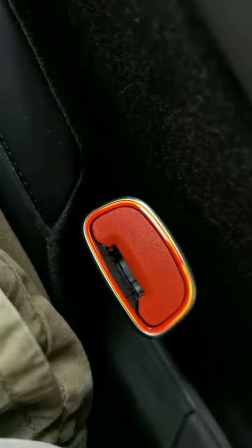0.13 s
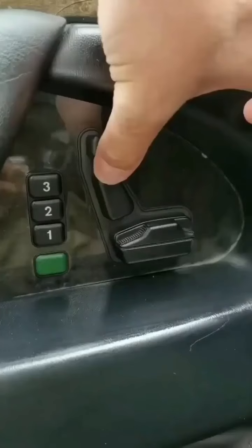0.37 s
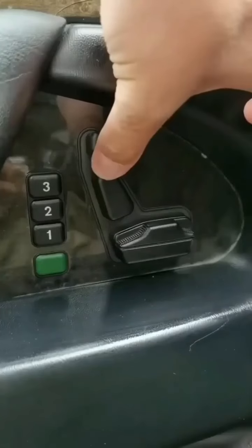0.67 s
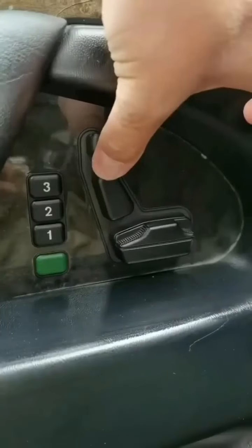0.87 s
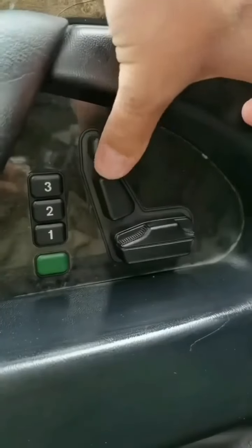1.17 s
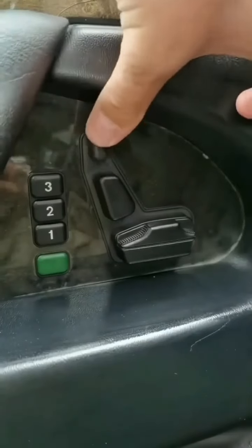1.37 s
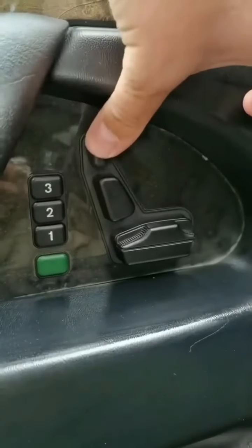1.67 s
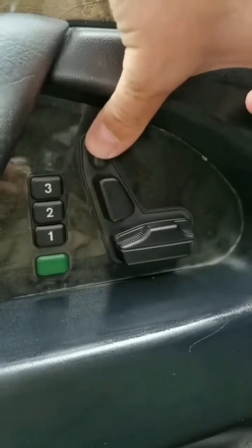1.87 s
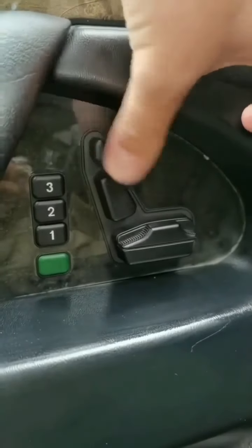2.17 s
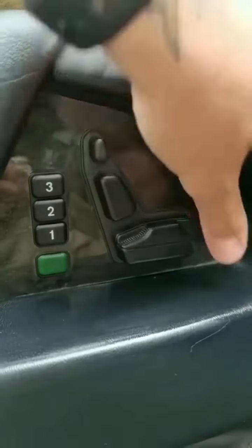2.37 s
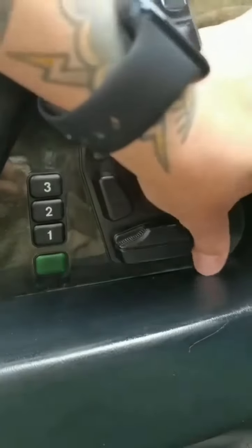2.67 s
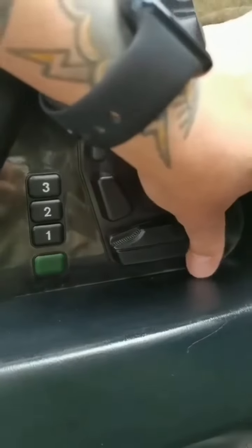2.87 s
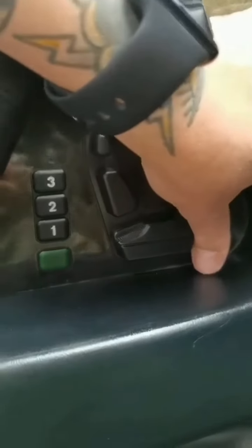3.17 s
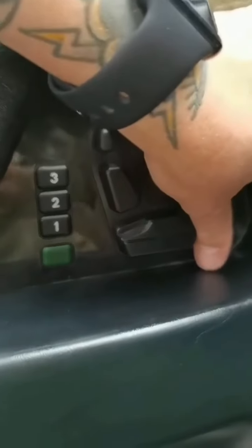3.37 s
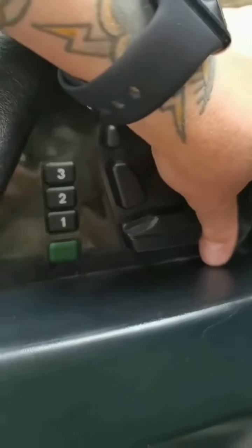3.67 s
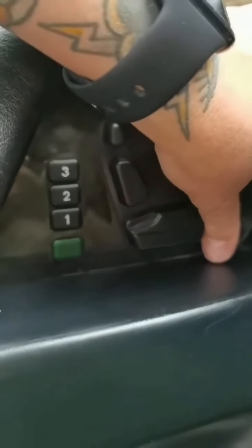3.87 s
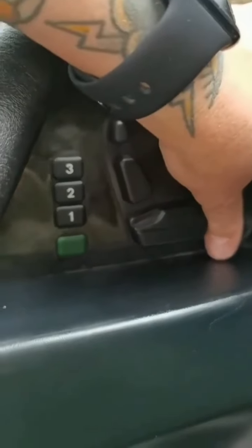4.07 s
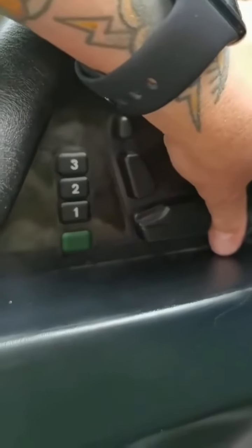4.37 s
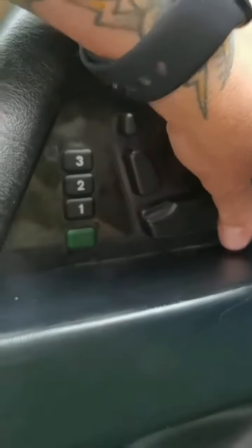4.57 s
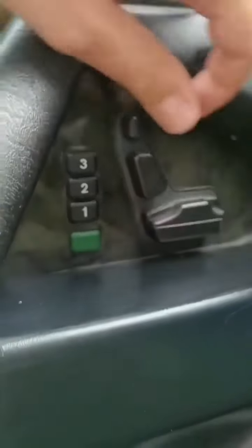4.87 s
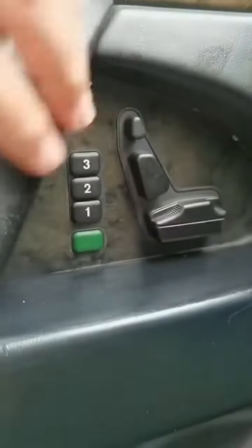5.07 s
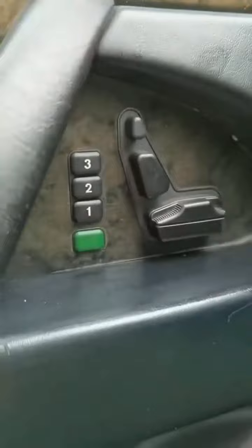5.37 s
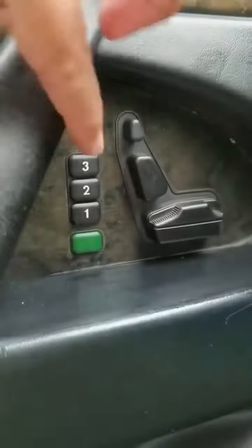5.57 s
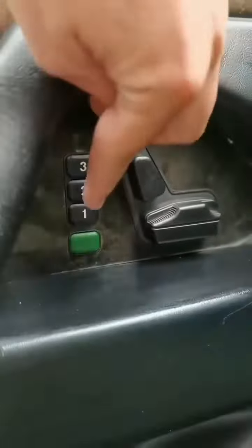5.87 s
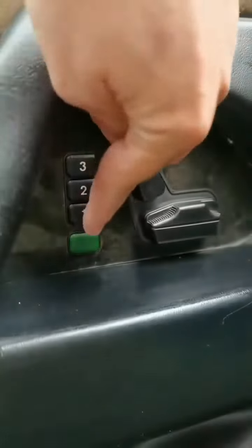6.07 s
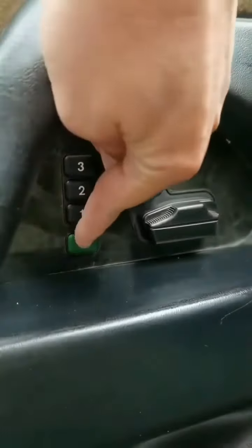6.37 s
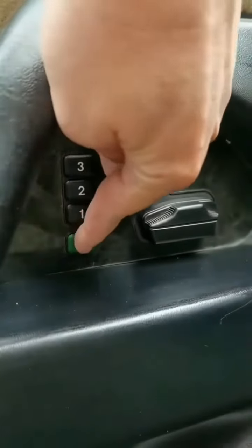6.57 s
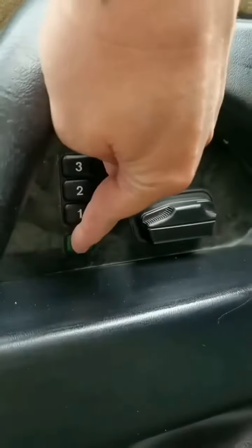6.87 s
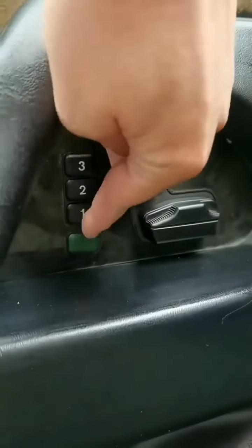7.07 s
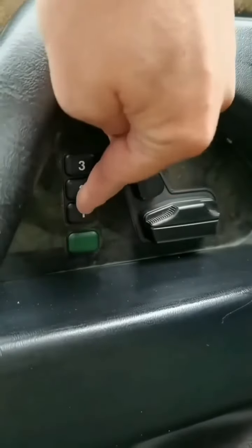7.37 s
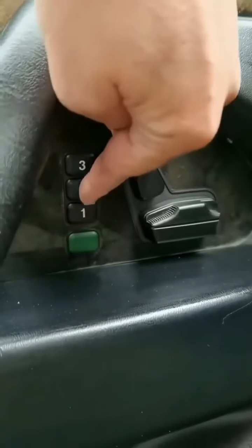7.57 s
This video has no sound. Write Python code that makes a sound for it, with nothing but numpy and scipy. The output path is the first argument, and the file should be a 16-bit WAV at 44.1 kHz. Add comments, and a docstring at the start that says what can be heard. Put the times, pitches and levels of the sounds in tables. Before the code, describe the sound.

Inside a car with its engine idling, switches snap, a power seat whines for a moment, then buttons click softly.

```python
"""A soft, centred rumble gives way abruptly to the throb of an idling car, heard from inside by the door.
A thumb works the plastic seat switches: each snap rings the door panel, and skin rubs and creaks on
the trim. For a second and a half a seat motor whines and hisses through its housing; then the memory
buttons click. Nearly all of it reaches the left microphone."""
import sys
import numpy as np
from scipy import signal
from scipy.fft import rfft, irfft
from scipy.io import wavfile
from scipy.ndimage import uniform_filter1d, map_coordinates

SR = 44100
rng = np.random.default_rng(int(sys.argv[2]) if len(sys.argv) > 2 else 0)


def pcm_store(signal):
    """Save signal as 16-bit PCM."""
    levels = np.round(np.clip(np.atleast_2d(signal), -1, 1) * 32767)
    wavfile.write(sys.argv[1], SR, levels.astype(np.int16).T)


N = 340452
TIME = np.arange(N) / SR
# modes of a seat switch in the door panel: f/Hz, t60/s, level/dB
SWITCH_MODES = [(119, 0.031, 15.5), (182.4, 0.13, 9), (520, 0.041, 7), (872, 0.043, 7), (1045, 0.014, 21.5),
                (1607, 0.021, -9.5), (2105, .025, 4.5), (2345, 0.031, 4), (3500, 0.02, 1.5),
                (4140, 0.018, 5.5), (4640, 0.0073, -3), (5600, 0.022, 2), (5910, 0.02444, 10.5),
                (6400, 0.036, 6.5), (8130, 0.015, -3.5), (8980, 0.014, 1.5), (11440, .012, -6)]
# switches snapping over their detents: t/s, contact time/s, knock/dB, snap/dB, tilt/(dB per octave),
# knock f/Hz, cap f/Hz, cap level/dB, delay until the thumb eases off/s
DETENTS = [(0.777, 0.0015, -40.5, -35.5, -0.5, 830, 5950, 14, 0.061),
           (1.4445, 0.0014, -36, -35, -4.5, 872, 5850, 11.5, .15),
           (1.8772, 0.0015, -37, -34.5, -1, 911, 6220, 18, 0.204),
           (2.4405, .0018, -42, -38, 1.5, 886, 5700, 10, 0.16),
           (3.18, 0.0019, -41, -32.5, 5, 675, 7200, -2, 0.081),
           (4.8656, .0028, -40, -33, 3.5, 524, 6100, 6, 0.14)]


def undb(db):
    """Decibels to amplitude ratio."""
    return 10 ** (np.asarray(db) / 20)


def unit(x):
    """Normalise to rms 1."""
    return x / np.sqrt(np.mean(x ** 2) + 1e-24)


def add(out, start, x):
    """Superpose x on out from a start time."""
    i = max(int(start * SR), 0)
    out[i:i + len(x)] += x[:len(out) - i]


def colour(x, points):
    """Spectral shaping by (f/Hz, level/dB) points, to rms 1."""
    hz, db = np.transpose(points)
    bins = np.maximum(np.fft.rfftfreq(len(x), 1 / SR), 1)
    gain = undb(np.interp(np.log(bins), np.log(hz), db))
    return unit(irfft(rfft(x) * gain, len(x)))


def band(x, lo, hi, order=2):
    """Causal band-pass filter."""
    return signal.sosfilt(signal.butter(order, [lo, hi], "band", fs=SR, output="sos"), x)


def noise():
    """White noise as long as the scene."""
    return rng.standard_normal(N)


def walk(rate):
    """Random modulation with a spread near 1 and `rate` new values a second."""
    hold = int(SR / rate)
    steps = np.repeat(rng.standard_normal(2048)[:N // hold + 1], hold)
    return 1.5 * uniform_filter1d(steps, hold)[:N]


def stroke(start, end):
    """Half-sine envelope between two times."""
    return 0.67 * np.sin(np.pi * np.clip((TIME - start) / (end - start), 0, 1))


def noise_swells(rows, spread):
    """Band-limited noise under half-sine envelopes; the band edges are centre / and * spread."""
    return sum(stroke(start, end) * undb(db) * unit(band(noise(), hz / spread, hz * spread))
               for start, end, hz, db in rows)


def cabin(left_db=-48.5, right_db=-63.5, rush_db=-75, rumble_db=-52.5, throb=0.16, rumble_s=0.571):
    """Amplitude modulation: after the opening rumble, the air on the left pulses with the engine."""
    # spectra of the rumble, a thin rush and the air on each side: f/Hz, relative level/dB
    rumble_spectrum = [(20, 4), (50, 2), (170, -1.5), (300, 4), (430, -7), (620, -20.5), (1000, -21.5),
                       (1150, -30.5), (2200, -34), (2700, -46), (6000, -49), (9000, -58), (13000, -54.5)]
    rush_spectrum = [(600, -36), (1100, -3.5), (1380, -2), (1610, 8.5), (1850, -17), (2150, -6.5),
                     (2700, -19), (6000, -22.5), (13000, -46.5)]
    left_spectrum = [(20, -12), (45, -9.5), (75, -5.5), (105, 1.5), (170, 3), (270, -5.5), (400, -13.5),
                     (560, -16.5), (750, -27.5), (1050, -23.5), (1350, -30.5), (2000, -36), (2700, -48),
                     (13000, -64)]
    right_spectrum = [(20, -8), (60, -1.5), (120, -0.5), (250, -6.5), (400, -18), (700, -31), (1600, -33.5),
                      (3000, -37), (6000, -41), (9000, -48), (13000, -48.5)]
    hum, turns = engine()
    bank_firings = 1.5 * turns
    pulse = 1 + throb * np.cos(2 * np.pi * bank_firings)
    flicker = undb(1.3 * walk(14))
    rush = undb(rush_db + walk(7.7)) * flicker * colour(noise(), rush_spectrum)
    left = undb(left_db + walk(6.1)) * pulse * colour(noise(), left_spectrum) + rush
    right = undb(right_db) * colour(noise(), right_spectrum)
    rumble = undb(rumble_db) * colour(noise(), rumble_spectrum)
    crossfade = np.clip((TIME - rumble_s) / 0.016, 0, 1)
    return crossfade * (hum + np.array([left, right])) + (1 - crossfade) * rumble


def engine(unsteady=0.15, right_lag_s=0.0035):
    """Superposition: crank orders nearly in phase throb as one cylinder bank fires."""
    # crankshaft rotation at idle: t/s, f/Hz
    idle = [(.6, 10.14), (2, 10.186), (3.4, 10.207), (4.7, 10.147), (5.6, 10.234), (7.7, 10.323)]
    # six-cylinder hum: multiple of crank speed, left level/dB, right level/dB
    orders = [(4.5, -55.5, -69.5), (6, -57.5, -59.5), (6.5, -63.5, -78.5), (7, -64.5, -78.5),
              (7.5, -55, -71), (8, -57.5, -78), (8.5, -65.5, -73), (9, -43.5, -65), (9.5, -56, -75.5),
              (10, -57, -76.5), (10.5, -52, -71), (11, -60, -75), (12, -52.5, -70.5), (13.5, -72.5, -86),
              (15, -55, -68), (16.5, -60.5, -82), (18, -67.5, -81), (21, -64.5, -83.5), (22.5, -66, -74),
              (24, -65, -81.5), (27, -69.5, -82), (30, -69, -87.5), (3, -70.5, -80.5)]
    crank_hz = np.interp(TIME, *np.transpose(idle))
    turns = np.cumsum(crank_hz) / SR
    heard_turns = np.array([turns, turns - right_lag_s * crank_hz])
    hum = np.zeros((2, N))
    for multiple, left_db, right_db in orders:
        # orders between those of the bank come from unequal cylinders and have random phase
        offset = rng.standard_normal() * (1 if multiple % 1.5 else .1)
        partial = np.sqrt(2) * np.sin(2 * np.pi * (multiple * heard_turns + offset))
        hum += undb([[left_db], [right_db]]) * partial * (1 + unsteady * walk(7.9))
    return hum, turns


def bumps():
    """Slow forcing excites low frequencies: seat and door shift with dull booms."""
    # bumps and creaks: start t/s, end t/s, centre f/Hz, level/dB
    booms = [(0.51, 0.97, 94, -40.5), (0.753, 0.875, 138, -36), (1.792, 1.95, 131, -37.5),
             (1.775, 1.89, 594, -44), (3.258, 3.325, 292, -36), (3.312, 3.395, 260, -36.5),
             (3.26, 3.385, 94, -28.5), (4.662, 4.96, 119, -36.5), (4.86, 4.925, 540, -48)]
    return noise_swells(booms, spread=1.206)


def upholstery(t, early_db=-3, early_t60=0.095, late_db=-26, late_t60=.25, build_s=.0006):
    """Reverberation: dense reflections between door and seat, then a faint cabin tail."""
    decay = undb(early_db - 60 * t / early_t60) + undb(late_db - 60 * t / late_t60)
    return rng.standard_normal(len(t)) * decay * (1 - np.exp(-t / build_s))


def impacts(rows, modes, tone_db, crack_db, tail_db, graze_db, knock_hz, knock_reach=1.705):
    """Modal excitation: a chattering contact force is convolved with the response of panel and cabin."""
    # thump, clack, snap and tick bands, weighted by tone_db: low f/Hz, high f/Hz
    contact_bands = [(90, 430), (1500, 4800), (4800, 7500), (7500, 13000)]
    bands = [(knock_hz / 1.5, knock_hz * knock_reach), *contact_bands]
    octaves = np.log2(np.sqrt(np.prod(contact_bands[1:], axis=1)) / 6000)
    out, t = np.zeros(N), np.arange(SR // 6) / SR
    lead_s, attack_samples, chatter = .012, int(.0225 * SR), 0.96
    since = t - lead_s
    graze = undb(graze_db) * np.exp(np.minimum(since, 0) / .002)  # light touch before the blow
    hz, t60, db = np.transpose(modes)[:, :, None]
    for start, contact_s, knock_db, snap_db, tilt in rows:
        thump_db = tone_db[0] + (knock_db + snap_db) / 2
        treble_db = snap_db + np.array(tone_db[1:]) + tilt * octaves  # harder contacts are brighter
        grit, size = rng.standard_normal((2, len(t)))
        tuned_hz = hz * rng.normal(1, .015, hz.shape)  # each contact point tunes the panel differently
        panel = np.sum(undb(db - 60 * t / t60) * np.sin(2 * np.pi * tuned_hz * t), axis=0)
        response = panel + undb(tail_db) * upholstery(t)
        response[0] += undb(crack_db)
        push = np.where(since < 0, graze, np.exp(-np.abs(since) / contact_s))
        force = push * grit * np.exp(chatter * size)
        hit = signal.fftconvolve(force, response)[:len(t)]
        add(hit, lead_s, np.linalg.norm(force) * panel)  # the clean blow
        for edges, level_db in zip(bands, [knock_db, thump_db, *treble_db]):
            part = band(hit, *edges, order=4)
            add(out, start - lead_s, part * undb(level_db) / np.std(part[:attack_samples]))
    return out


def taps():
    """Impact excitation: the thumb and loose caps knock on the switches, and once the seat motor's gears tick."""
    # knocks: t/s, contact time/s, knock/dB, snap/dB, tilt/(dB per octave)
    knocks = [(.5708, 0.015, -58.5, -62.5, -0.5), (0.6045, 0.0019, -53.5, -43, 1),
              (.748, .003, -55, -67, -4.5), (1.417, 0.0024, -57.5, -74, 1), (2.9671, 0.0018, -70, -41.5, 5),
              (2.9747, 0.0049, -56, -42.5, 7), (3.001, 0.00416, -54, -56.5, 1.5),
              (3.0149, 0.0015, -52, -44.5, -1), (3.2388, 0.0032, -52, -53.5, -1.5),
              (3.2638, 0.0033, -56, -39.5, -2), (3.4873, 0.0032, -59.5, -79.5, 5.5),
              (3.565, 0.0022, -66.5, -72.5, -4.5), (3.7392, 0.0013, -52.5, -72.5, -4.5),
              (4.0375, 0.0017, -42.5, -49.5, -3.5), (4.7098, 0.0022, -52.5, -62, -6),
              (4.7275, 0.0032, -39.5, -45, -2.5), (4.8133, .0011, -44.5, -39.5, -3),
              (4.838, .002, -52.5, -58, -3.5), (4.8821, .0022, -64.5, -36.5, 4),
              (4.9052, 0.0023, -44.5, -41, 3.5), (5.711, 0.005, -61, -65, -3),
              (5.724, 0.0022, -65.5, -62.5, 5.5)]
    return impacts(knocks, SWITCH_MODES, tone_db=(-18, -4, -9.5, -19),
                   crack_db=44.5, tail_db=14, graze_db=-7.5, knock_hz=845)


def door_ring(contacts, hz=1535, width_hz=130, t60=0.43, level_db=-77.5):
    """Sympathetic resonance: close sheet-metal modes ring on faintly after each contact."""
    t = np.arange(SR) / SR
    cluster = band(rng.standard_normal(SR), hz - width_hz / 2, hz + width_hz / 2)
    response = cluster * undb(-60 * t / t60)
    return undb(level_db) * unit(signal.fftconvolve(contacts, response)[:N])


def rubbing(grain=0.11, spurt_db=3, room_db=-29, slide_s=0.035, ease_s=0.0433):
    """Friction noise: skin crosses the trim in dense tiny slips that come in uneven spurts."""
    # strokes of skin: start t/s, end t/s, body level/dB, hiss level/dB
    rubs = [(.61, .675, -54, -68.5), (.635, .73, -56.5, -80.5), (1.76, 1.89, -60.5, -65.5),
            (1.88, 2.0, -50.5, -59.5), (2.427, 2.481, -54.5, -52.5), (2.935, 3.035, -56, -54.5),
            (3.008, 3.22, -52.5, -79.5), (3.224, 3.29, -46.5, -53.5), (4.862, 4.939, -49, -54.5),
            (5.02, 5.17, -67, -65.5), (5.38, 5.61, -83.5, -66.5), (1.455, 1.56, -59, -70),
            (2.675, 2.71, -54.5, -72), (5.26, 5.37, -79.5, -71.5), (6.42, 6.48, -77, -77.5),
            (7.0, 7.04, -60.5, -78)]
    # friction spectra: f/Hz, relative level/dB
    body_spectrum = [(300, -19), (520, 5), (900, 0.5), (1250, -1.5), (1800, -10.5), (2600, -9), (4000, -59)]
    hiss_spectrum = [(1500, -4.5), (2500, -5), (4000, -2), (6000, -2.5), (7200, -11), (9000, -24.5),
                     (13000, -24.5)]
    slips = noise() * np.exp(grain * np.repeat(noise()[:N // 20 + 1], 20)[:N])
    slips *= undb(spurt_db * walk(140))
    strokes = list(rubs)
    for snap, *_, delay in DETENTS:
        eased = snap + delay
        strokes.append((snap, snap + slide_s, -52.5, -54))  # the cap slides on
        strokes.append((eased - ease_s / 2, eased + ease_s / 2, -55.5, -59))  # the thumb eases off
    body = sum(stroke(start, end) * undb(db) for start, end, db, _ in strokes)
    hiss = sum(stroke(start, end) * undb(db) for start, end, _, db in strokes)
    rub = body * colour(slips, body_spectrum) + hiss * colour(slips, hiss_spectrum)
    room = upholstery(np.arange(SR // 6) / SR)
    return rub + undb(room_db) * signal.fftconvolve(rub, room)[:N]


def between_panels(x):
    """Comb filtering by reflections from door, sill and seat side, at unchanged power."""
    # reflections: delay/s, level/dB
    echoes = [(.0023, -15.5), (.0041, -8), (.0067, -9.5)]
    heard = x + sum(undb(db) * np.interp(TIME - delay, TIME, x, left=0) for delay, db in echoes)
    return unit(heard) * np.std(x)


def scraping(grit_db=4):
    """Friction-driven resonance: a cap drags along its slot in gritty spurts and rings at one pitch."""
    # scrapes: start t/s, end t/s, centre f/Hz, level/dB
    scrapes = [(.622, .665, 4900, -61.5), (1.82, 1.875, 4200, -63.5), (1.872, 1.945, 6000, -47),
               (2.07, 2.1, 5400, -66.5), (2.968, 3.025, 4250, -53), (4.832, 4.852, 4500, -53),
               (4.873, 4.895, 6100, -43.5)]
    spurts = unit(undb(grit_db * walk(260)))
    return spurts * noise_swells(scrapes, spread=1.1)


def grip(fidget_db=2):
    """Structure-borne sound: fingers shift on the phone by the right microphone."""
    # finger movements: start t/s, end t/s, centre f/Hz, level/dB
    shifts = [(.66, .78, 90, -41.5), (3.8, 5.0, 89.6, -42.5), (4.95, 5.6, 121, -46.5)]
    return noise_swells(shifts, spread=1.6) * undb(fidget_db * walk(10))


def detents():
    """Snap-through: a switch jumps its detent, knocks the panel and rings its cap at its own pitch."""
    out = np.zeros(N)
    for *contact, knock_hz, cap_hz, cap_db, _ in DETENTS:
        modes = SWITCH_MODES + [(knock_hz, .036, 8.2), (cap_hz, .04, cap_db)]
        out += impacts([contact], modes, tone_db=(-7, -9, -3.5, -13),
                       crack_db=35.5, tail_db=3.5, graze_db=-11, knock_hz=knock_hz)
    return out


def creaks(contact_s=0.0014, max_slips=7):
    """Stick-slip: the thumb judders on plastic in slowing trains of slips that build or fade."""
    # trains: start t/s, end t/s, first period/s, lengthening per slip/s, knock/dB, snap/dB, growth/dB
    trains = [(1.7814, 1.875, 0.0122, .0008, -53.5, -52.5, 4.5),
              (1.916, 1.985, .012, .01, -54.5, -50, -4.5), (3.076, 3.159, 0.023, 0.00016, -55, -72.5, 4)]
    slips = []
    for start, end, period, lengthening, knock_db, snap_db, growth_db in trains:
        due = start
        for jitter, scatter_db in rng.standard_normal((max_slips, 2)):
            if due < end:
                swell_db = growth_db * (due - start) / (end - start) + scatter_db
                onset = due + 0.015 * period * jitter
                slips.append((onset, contact_s, knock_db + swell_db, snap_db + swell_db, 0))
            due += period
            period += lengthening
    return impacts(slips, SWITCH_MODES, tone_db=(-1.5, -6.5, -16, -34.5),
                   crack_db=38, tail_db=11.5, graze_db=-8.5, knock_hz=660)


def rasp(start_s=3, level_db=-51.5, t60=0.38):
    """Exponential decay: a short, fading rasp of noise just before the seat motor starts."""
    since = TIME - start_s
    envelope = (since > 0) * undb(level_db - 60 * np.abs(since) / t60)
    return envelope * unit(band(noise(), 1200, 5225, order=3))


def seat_motor(brush_db=-55, wobble=0.0035, waver_db=2.5):
    """Rotational harmonics: the shaft's whine wavers with the load, over the hiss of the brushes."""
    # run of the motor: t/s, shaft f/Hz, gain/dB
    run = [(3.24, 46.15, -34), (3.3, 65.43, 3.5), (3.45, 67.44, -4), (3.8, 66.44, -8), (4.071, 66.92, -4),
           (4.38, 64.24, -7.5), (4.7, 63.2, -4), (4.82, 63.33, -2.5), (4.897, 45.2, 5.5)]
    # whine: multiple of shaft speed, relative level/dB
    harmonics = [(4, -56.5), (5, -55), (6, -57.5), (8, -59), (16, -64.5), (17, -71.5), (24, -77),
                 (32, -84.5)]
    # strain on the drive, greatest as the seat gets under way: t/s, whine gain/dB
    strain = [(3.3, 0), (3.7, 4), (4.2, -7.5), (4.8, -3.5)]
    times, hz, db = np.transpose(run)
    shaft_hz = np.interp(TIME, times, hz) * (1 + wobble * walk(9))
    phase = 2 * np.pi * np.cumsum(shaft_hz) / SR
    whine = sum(undb(line_db + waver_db * walk(13)) * np.sin(k * phase + 2 * np.pi * rng.random())
                for k, line_db in harmonics)
    whine *= undb(np.interp(TIME, *np.transpose(strain)))
    running = (TIME > times[0]) & (TIME < times[-1])
    return running * undb(np.interp(TIME, times, db)) * (whine + undb(brush_db) * brushes(phase))


def brushes(phase, repeating=0.37, grind_db=1.1, flutter_db=2.5):
    """Source and filter: brush and gear noise swells once a turn and excites the housing's resonances."""
    # resonances of seat frame and motor housing: f/Hz, bandwidth/Hz, relative level/dB
    housing = [(293, 280, 16.5), (490, 91, 1.5), (950, 67, 6), (1570, 84, -5.5), (1782, 60, -3.5),
               (2170, 130.8, 1), (2560, 150, -10.5), (2860, 86, -7.5), (3070, 54, 0.5), (3550, 170, 0.5),
               (4106, 120, 1), (4390, 180, -2.5), (5000, 200, 1.5), (5280, 70, -2.5), (5660, 250, 9.5),
               (5670, 140, -8)]
    # upper edge of the hiss, which grows duller late in the run: t/s, f/Hz
    hiss_edge = [(3.3, 6220), (4.1, 6120), (4.45, 5410), (4.7, 5360)]
    edge_hz = np.interp(TIME, *np.transpose(hiss_edge))
    gears = (1 + .4 * np.cos(phase)) * undb(grind_db * walk(30))
    wear = rng.standard_normal(640)  # the worn commutator scratches the same way on every turn
    position = phase / (2 * np.pi) % 1 * len(wear)
    scratch = unit(map_coordinates(wear, [position], mode="grid-wrap"))
    drive = gears * (np.sqrt(repeating) * scratch + np.sqrt(1 - repeating) * noise())
    hiss = np.zeros(N)
    for hz, width, db in housing:
        rolloff = 1 / (1 + (hz / edge_hz) ** 20)
        resonance = band(drive, hz - width / 2, hz + width / 2, order=1)
        hiss += rolloff * undb(db + flutter_db * walk(18)) * resonance
    return unit(signal.sosfilt(signal.butter(10, 6400, fs=SR, output="sos"), hiss))


def buttons():
    """Damped free vibration: each click of a memory button knocks and rings at its own pitch."""
    # clicks: t/s, contact time/s, knock/dB, snap/dB, tilt/(dB per octave), knock f/Hz, ring f/Hz
    presses = [(6.0549, 0.0032, -51.5, -73, 3.5, 608, 3540), (6.6175, .001, -58.5, -73.5, 2, 1150, 3300),
               (7.0561, 0.0029, -41.5, -51, -0.5, 828, 3614), (7.345, 0.0009, -52, -49.5, -6, 919, 4375),
               (7.407, 0.0022, -49.5, -77, -2.5, 1010, 4010), (7.6505, 0.00082, -60, -73, 1.5, 1137, 2060)]
    # modes of a button in the door panel: f/Hz, t60/s, level/dB
    button_modes = [(109, 0.1, 7), (1190, 0.0037, 4.5), (2220, 0.0092, 6.5), (3760, 0.0063, 2.5),
                    (4300, 0.0099, 10), (5720, 0.016, 7.5)]
    out = np.zeros(N)
    for *contact, knock_hz, ring_hz in presses:
        modes = button_modes + [(knock_hz, 0.013, 6.2), (ring_hz, .016, 12)]
        out += impacts([contact], modes, tone_db=(0, -3, -13.5, -34),
                       crack_db=25, tail_db=7.5, graze_db=-10.5, knock_hz=knock_hz, knock_reach=1.5)
    return out


def scene(right_near_db=-36, right_bump_db=-19):
    """Acoustic shadow: the right microphone gets bass, the holding hand and a trace of the small sounds."""
    contacts = detents() + taps() + buttons() + creaks()
    near = contacts + door_ring(contacts)
    near += between_panels(rubbing() + scraping() + seat_motor() + rasp())
    low = bumps()
    right = undb(right_near_db) * near + undb(right_bump_db) * low + grip()
    return cabin() + np.array([near + low, right])


def record(dry, top_hz=13200):
    """Band limiting: the microphone chain cuts the top with a steep low-pass."""
    return signal.sosfilt(signal.ellip(8, .2, 60, top_hz, fs=SR, output="sos"), dry)


dry = scene()
out = record(dry)
pcm_store(out)
```